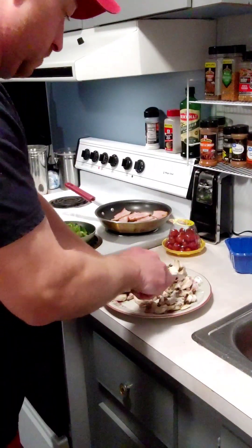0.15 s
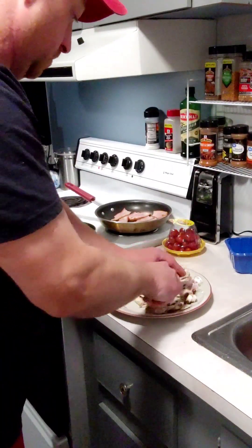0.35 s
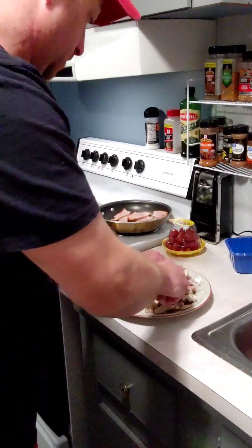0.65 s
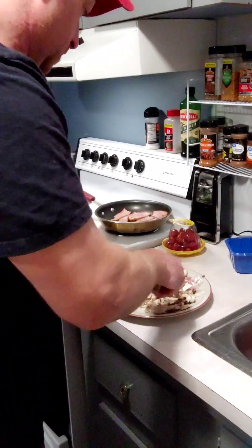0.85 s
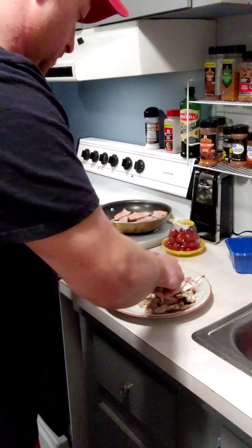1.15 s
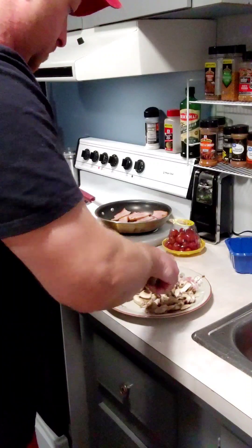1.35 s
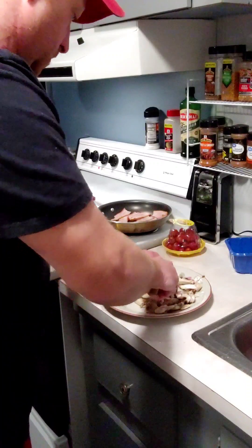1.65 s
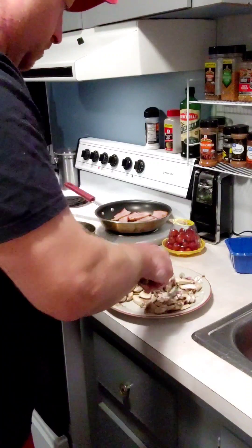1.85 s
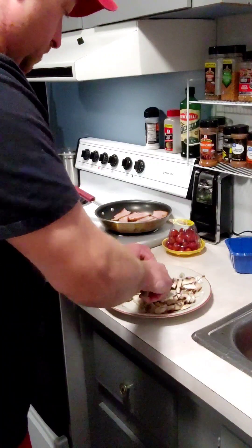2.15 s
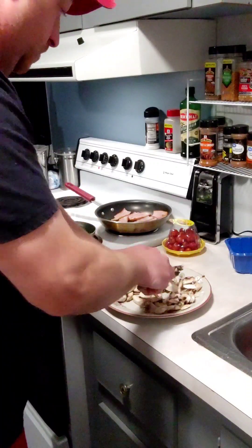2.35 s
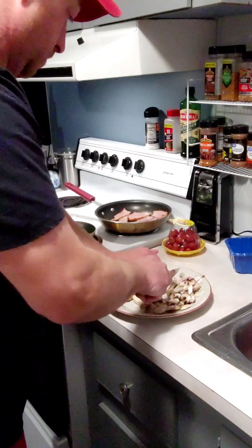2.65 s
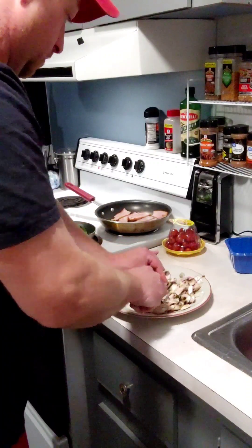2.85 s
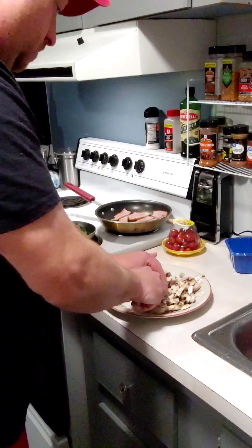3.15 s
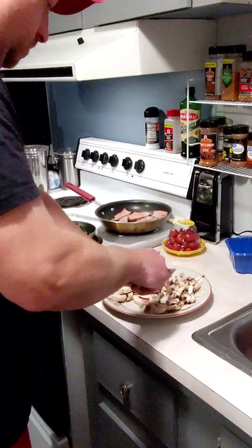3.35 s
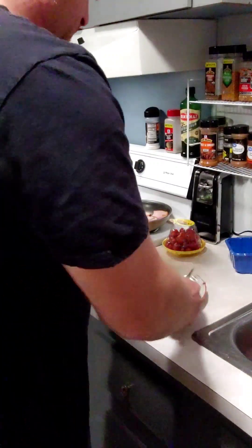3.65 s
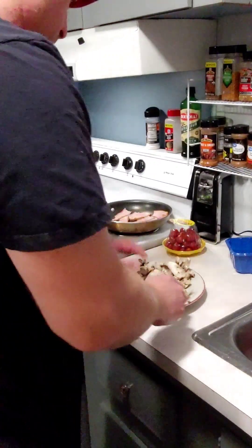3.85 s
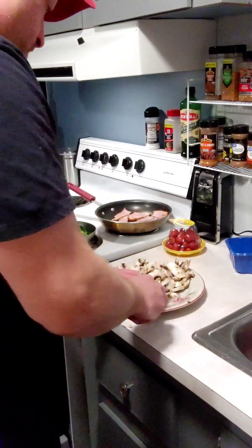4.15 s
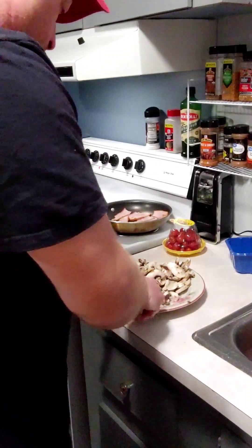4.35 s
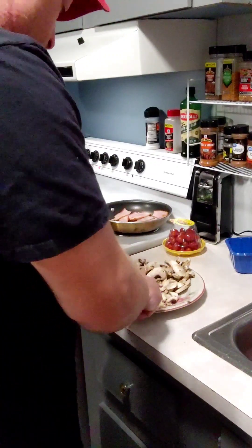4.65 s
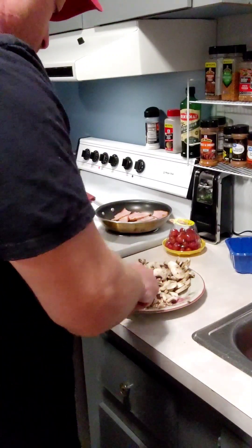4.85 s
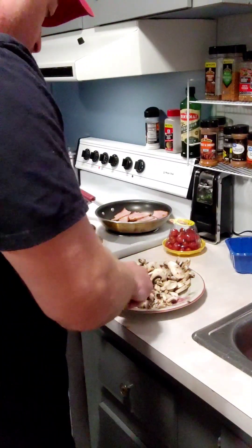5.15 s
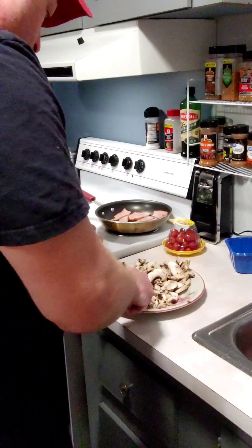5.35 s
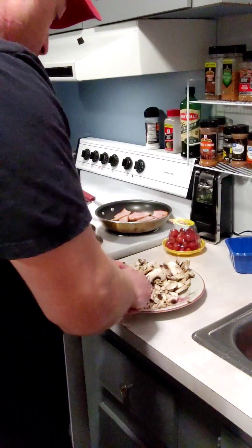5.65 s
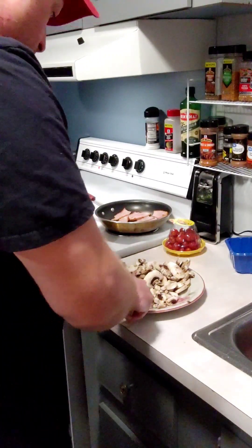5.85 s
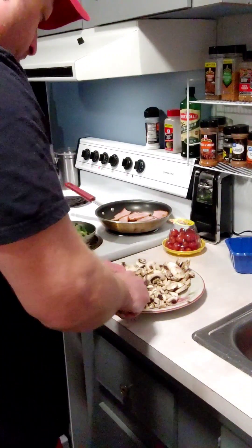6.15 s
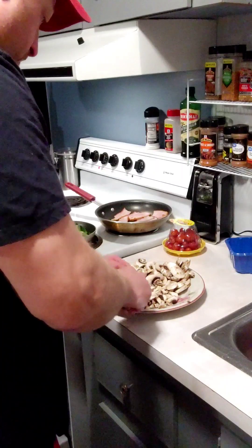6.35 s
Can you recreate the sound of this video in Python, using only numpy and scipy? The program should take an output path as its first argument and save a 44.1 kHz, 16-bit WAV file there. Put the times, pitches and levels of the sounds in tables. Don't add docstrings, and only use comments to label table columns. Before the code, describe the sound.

A knife slices mushrooms on a ceramic plate, short damped clacks and clinks at an unhurried pace, over a soft hood fan hum in a small kitchen.

```python
import sys
import numpy as np
from scipy import signal
from scipy.fft import rfft, irfft
from scipy.io import wavfile
from scipy.ndimage import uniform_filter1d

SR = 44100
rng = np.random.default_rng(int(sys.argv[2]) if len(sys.argv) > 2 else 0)


def output_pcm(signal):
    pcm = np.clip(np.atleast_2d(signal).T, -1, 1) * 32767
    wavfile.write(sys.argv[1], SR, np.round(pcm).astype(np.int16))


def gain_from_db(level_db):
    decades = np.asarray(level_db, float) / 20
    return 10 ** decades


N = 287091
LEAD_S = 0.008


# (time [s], peak level [dB], place [0 centre - 1 rim], sharpness [dB], chatter [ms])
CUTS = [(0.7203, -20.5, 0.86, -11, 2.6), (0.817, -25.5, .1, -8.5, 12), (1.0822, -16, -0.0085, -12.5, 1.05),
        (1.3239, -11.5, 0.019, -8, 3.5), (1.7375, -14.5, 0.11, -11, 6.1),
        (2.2073, -13.5, 0.033, -10.5, 0.5), (2.5535, -18, 0.72, 2.5, 2.7), (2.807, -10, 0.75, -0.5, 5),
        (3.0646, -18.5, 0.15, -3.5, 6.2), (4.769, -20.5, 0.033, -11, 8.5), (5.0325, -11, 0.82, -6, 2.2),
        (5.3003, -8.5, 0.98, -5.5, 5.6), (5.538, -7, 0.96, -7.5, 7.8), (5.8517, -18.5, 0.99, -2, 11.3),
        (6.0901, -13, 0.98, -3, 6.5), (6.2932, -9, 0.87, -4, 5.9)]
# (time [s], peak level [dB], place [0 centre - 1 rim], sharpness [dB], blade ping [dB])
TOUCHES = [(0.0478, -52, 1.2, -11, -15), (0.413, -36, 0, -6.5, 3.5), (1.49, -63, 0.15, -15, -17),
           (1.6662, -29, 0, -13.5, -27), (2.0477, -53.5, 0.03, -2.5, -14), (2.15, -29.5, 0, -15, -23),
           (2.4334, -52.5, 0, 5, -25), (3.217, -46, 0.72, -16, -35.5), (3.3, -47, 0.84, -6, -5),
           (4.0074, -41, 0.25, -5, 10), (4.061, -27.5, 0.94, -10, -25), (4.2565, -51.5, 0, -12, -31),
           (4.383, -24.5, 0.58, -15.5, -24), (4.489, -44, 0.35, -7, -15), (4.5944, -60, 0.58, -4, -13)]
CUT_PING_DB, CUT_EDGE_DB = -17, -1.5
TOUCH_CHATTER_MS, TOUCH_EDGE_DB = 6, -5


def played():
    cuts = [(*row, CUT_PING_DB, CUT_EDGE_DB) for row in CUTS]
    touches = [(*row[:4], TOUCH_CHATTER_MS, row[4], TOUCH_EDGE_DB) for row in TOUCHES]
    return np.transpose(sorted(cuts + touches))


def contacts(chatter_ms, slide_db=-22, slide_s=0.039):
    t = np.arange(4096) / SR - LEAD_S
    chatter = np.clip(chatter_ms[:, None], 0.2, 12) / 1000
    landing = 0.00069 + 0.2 * chatter
    crunch = np.clip((t + 1.72 * landing) / 0.00037, 0.12, 1)
    before = np.exp(t / landing) * crunch
    after = np.exp(-(t / chatter) ** 2) + gain_from_db(slide_db) * np.exp(-t / slide_s)
    grit = rng.standard_normal((len(chatter), len(t)))
    return np.where(t < 0, before, after) * grit * np.abs(grit)


def ring(force, hz, t60):
    r = gain_from_db(-60 / (max(t60, 0.005) * SR))
    w = 2 * np.pi * hz / SR
    return signal.lfilter([0, np.sin(w)], [1, -2 * r * np.cos(w), r * r], force + 1e-18)


def pair(force, hz, t60, spread, mix=0.48):
    low = ring(force, hz - spread / 2, t60)
    high = ring(force, hz + spread / 2, t60)
    return np.array([low + mix * high, high - mix * low * np.clip(hz / 700 - 2, -1, 1)])


def scaled(rows, levels_db):
    size = np.sqrt(np.sum(rows ** 2, axis=(0, 2)) / 100)
    return rows * (gain_from_db(levels_db) / size)[:, None]


THUD_MODES = [(402, -6.5, 0.082, 50), (466, -6.5, 0.0099, 51), (649, -1.5, 0.034, 13),
              (814, -11, 0.046, 120), (1470, -6, 0.047, 39)]
RIM_MODES = [(1026, -8.5, .025, 28), (1641, 13.5, 0.087, 35.4), (1767, 10, 0.07, 24),
             (1922, 8.5, 0.046, 42)]
CENTRE_MODES = [(2296, -1.7, .07, 25)]
BODY_MODES = [(2463, -14, 0.02, 160), (2880, -7.5, 0.018, 180), (3077, -7, 0.025, 150),
              (3580, -19, 0.015, 200)]
BRIGHT_MODES = [(5265, -8, 0.0034, 260), (6250, -11, 0.02, 510), (6923, -0.5, 0.018, 114)]
SHOULDER_MODES = [(4480, 1, 0.02, 122), (4623, -7.5, 0.043, 57)]
WELL_MODES = [(4767, -4, 0.022, 113), (10910, -2.5, 0.0051, 360)]
PING_MODES = [(3260, 0, 0.045, 70)]
EDGE_MODES = [(8900, -20, .015, 200), (9300, -12, .015, 250), (9800, -17, .015, 200),
              (12000, -20, .015, 200), (12400, -17, .02, 200), (13850, -18, .02, 200),
              (14250, -21, .015, 200)]
# (low edge [Hz], high edge [Hz])
RIM_GAP_HZ = [1230, 1570]
TURN_S = 3.75


def rim_lobes(sound):
    sound = signal.sosfilt(signal.butter(3, 1150, "high", fs=SR, output="sos"), sound)
    sound = signal.sosfilt(signal.butter(2, RIM_GAP_HZ, "stop", fs=SR, output="sos"), sound)
    return np.array([gain_from_db(-2.5) * np.roll(sound[0], 6, axis=-1), gain_from_db(2.5) * sound[1]])


def blows():
    s, peak, spot, sharp, chatter, ping, edge = played()
    thud = np.minimum(-22 + 0.28 * peak + 6.5 * spot, peak + 3) - 17 * (s > TURN_S)
    bright = peak + sharp
    families = [(THUD_MODES, thud), (RIM_MODES, peak - 24 + 13 * spot),
                (CENTRE_MODES, peak - 6.5 - 28 * spot), (BODY_MODES, peak),
                (BRIGHT_MODES, bright), (SHOULDER_MODES, bright - 3 * (1 - spot)),
                (WELL_MODES, bright - 21 * spot), (PING_MODES, peak + ping), (EDGE_MODES, bright + edge)]
    force = contacts(chatter)
    dull = signal.sosfilt(signal.butter(4, 7600, fs=SR, output="sos"), force)
    place = rng.standard_normal((len(s), 30))
    out, k = 0, 0
    for modes, family_db in families:
        sound = 0
        for hz, db, t60, spread in modes:
            rows = pair(force if hz > 8000 else dull, hz, t60, spread)
            sound = sound + scaled(rows, family_db + db + 1.5 * place[:, k])
            k += 1
        if modes is RIM_MODES:
            sound = rim_lobes(sound)
        out = out + sound
    out = out + scaled(np.array([dull, dull]), peak - 21)
    out = signal.sosfilt(signal.butter(4, [290, 14300], "band", fs=SR, output="sos"), out)
    pan_db = -2 * spot
    return out * gain_from_db(np.array([pan_db, -pan_db]) / 2)[..., None]


def lay(rows):
    out = np.zeros((2, N + rows.shape[-1]))
    for k, s in enumerate(played()[0]):
        at = round((s - LEAD_S) * SR)
        out[:, at:at + rows.shape[-1]] += rows[:, k]
    return out[:, :N]


def rub_stroke(start, length, db):
    t = np.arange(N) / SR
    swell_db, fall_db = 1100 * (start - t), 350 * (t - start - length)
    return gain_from_db(db - np.maximum(0, np.maximum(swell_db, fall_db)))


# (start [s], length [s], level [dB], brightness [dB])
RUBS = [
    (3.28, 0.068, -65.5, -8),
    (3.69, 0.15, -70.5, -0.5),
    (0.816, 0.021, -55, 6),
    (1.301, 0.028, -58.5, -11),
    (2.19, 0.027, -62, -10),
    (4.463, 0.053, -68, -11),
    (4.782, 0.018, -50, -7),
]


def rubbing(damping=0.75):
    grit = rng.standard_normal(N) * gain_from_db(-11.5)
    low = grit * sum(rub_stroke(start, length, db) for start, length, db, bright in RUBS)
    high = grit * sum(rub_stroke(start, length, db + bright) for start, length, db, bright in RUBS)
    groups = [(low, RIM_MODES, -17.0), (low, CENTRE_MODES, -9.0), (low, BODY_MODES, 3.0),
              (high, BRIGHT_MODES, -6.0), (high, SHOULDER_MODES, -5.0), (high, WELL_MODES[:1], -1.5)]
    out = 0
    for friction, modes, group_db in groups:
        for hz, db, t60, spread in modes:
            out = out + gain_from_db(db + group_db) * pair(friction, hz, damping * t60, spread)
    return out


# (time [s], peak level [dB])
TICKS = [(0.3282, -52), (0.385, -47), (0.6005, -40), (1.1894, -44), (1.5644, -59), (1.9594, -59),
         (2.3894, -57), (3.3294, -60), (3.4494, -59), (3.5594, -52), (3.629, -39), (4.172, -42),
         (4.6294, -51)]


def ticks(length_s=0.0034):
    t = np.arange(N) / SR
    shape = sum(gain_from_db(db - 14.0) * np.exp(-((t - s - length_s) / length_s) ** 2) for s, db in TICKS)
    treble = signal.butter(1, 2500, "high", fs=SR, output="sos")
    return shape * signal.sosfilt(treble, rng.standard_normal((2, N)))


def at_hz(points, hz):
    table_hz, values = np.transpose(points)
    return np.interp(np.log(hz + 1), np.log(table_hz), values)


# (frequency [Hz], left-right likeness [0-1])
LIKENESS = [(60, 0.95), (130, 1), (290, 0.96), (640, 0.87), (1410, 0), (3100, 0), (6820, 0.04),
            (15000, 0.02)]


def diffuse(noise):
    alike = np.clip(at_hz(LIKENESS, np.fft.rfftfreq(noise.shape[-1], 1 / SR)), 0, 1)
    mid, side = rfft(noise)
    shared, apart = np.sqrt(1 + alike) * mid, np.sqrt(1 - alike) * side
    return np.array([shared + apart, shared - apart])


# (frequency [Hz], T60 [s])
KITCHEN_T60 = [(200, 0.26), (1500, 0.25), (5000, 0.19), (9000, 0.097), (14000, .24)]


def kitchen(count):
    t = np.arange(12288) / SR
    noise = irfft(diffuse(rng.standard_normal((2, count, len(t)))), len(t))
    edges = np.geomspace(150, 17000, 7)
    echo = 0
    for low, high in zip(edges, edges[1:]):
        band = signal.sosfilt(signal.butter(2, [low, high], "band", fs=SR, output="sos"), noise)
        echo = echo + band * gain_from_db(-60 * t / at_hz(KITCHEN_T60, np.sqrt(low * high)))
    echo = echo * np.clip((t - 0.002) / 0.003, 0, 1)
    return echo / np.sqrt(np.sum(echo ** 2, axis=-1, keepdims=True))


# (time [s], level [dB])
FAN_LEVEL = [(0, -49), (1, -43), (2, -43), (3, -46), (4, -44.5), (5, -44.5), (6, -43), (6.6, -43)]
# (frequency [Hz], density [dB per Hz])
FAN = [(12, -73), (20, -2), (49, -4), (143, -3.5), (217, -3.5), (477, -14), (580, -12), (989, -14.5),
       (1780, -26.5), (2230, -27.5), (4630, -39), (6850, -37.5), (11000, -44), (14600, -42.5), (16400, -83)]
# (frequency [Hz], width [Hz], level [dB])
FAN_PEAKS = [(60.2, 9.7, 5.5), (185.6, 29, 2.5), (6670, 233, 6), (11300, 170, 6.5), (15300, 500, -9)]


def fan():
    hz = np.fft.rfftfreq(N, 1 / SR)
    db = at_hz(FAN, hz) + sum(top * np.exp(-((hz - mid) / width) ** 2) for mid, width, top in FAN_PEAKS)
    air = irfft(diffuse(rng.standard_normal((2, N))) * gain_from_db(db), N)
    air = air / np.sqrt(np.mean(air ** 2) + 1e-20)
    s, level_db = np.transpose(FAN_LEVEL)
    return air * gain_from_db(np.interp(np.arange(N) / SR, s, level_db, left=-200, right=-200))


def scene():
    strikes, rub = blows(), rubbing()
    echo = gain_from_db(-7.0) * kitchen(count=len(CUTS + TOUCHES))
    wet = lay(signal.fftconvolve(strikes, echo, axes=-1))
    wet = wet + signal.fftconvolve(rub, echo[:, 0], axes=-1)[:, :N]
    return lay(strikes) + rub + wet + fan() + ticks()


def band_limit(x):
    return signal.sosfilt(signal.butter(12, 16510, fs=SR, output="sos"), x)


# (frequency [Hz], width [Hz], level [dB])
MIC_NOTCHES = [(8250, 350, -6.0), (10950, 650, -15.0), (13300, 300, -6.0)]
# (frequency [Hz], left-right difference [dB])
TILT = [(100, 1.5), (350, -1.5), (900, -9), (1300, -4.5), (2250, 10), (3000, 0.5), (5500, -6), (6500, 10),
        (7700, -13), (9200, 8), (11000, -3.5), (12500, 3), (15000, -2.5)]


def record(dry, knee_db=-36, share=0.28, release_db_s=6.5, attack_s=0.014, late_s=0.01):
    hz = np.fft.rfftfreq(N, 1 / SR)
    colour_db = sum(db * np.exp(-((hz - mid) / width) ** 2) for mid, width, db in MIC_NOTCHES)
    shade = gain_from_db(colour_db + np.array([[1], [-1]]) * at_hz(TILT, hz) / 2)
    x = irfft(rfft(dry) * shade, N)
    x = signal.sosfilt(signal.butter(14, 15000, fs=SR, output="sos"), x)
    power = uniform_filter1d(np.mean(x ** 2, axis=0), size=256, origin=127)
    cut = share * np.maximum(10 * np.log10(power + 1e-12) - knee_db, 0)
    t = np.arange(N) / SR
    cut = np.maximum.accumulate(cut + release_db_s * t) - release_db_s * t
    r = np.exp(-1 / (attack_s * SR))
    cut = np.interp(t - late_s, t, signal.lfilter([1 - r], [1, -r], cut))
    mix = 0.62 * np.tanh(x * gain_from_db(-cut) / 0.62)
    return band_limit(mix)


dry = scene()
out = record(dry)
output_pcm(out)
```